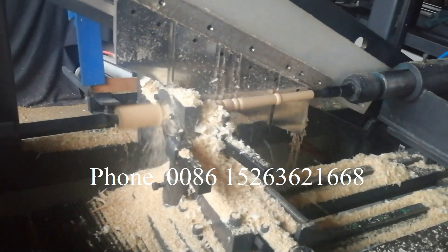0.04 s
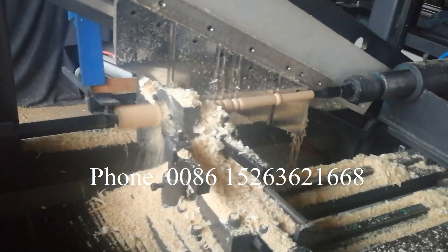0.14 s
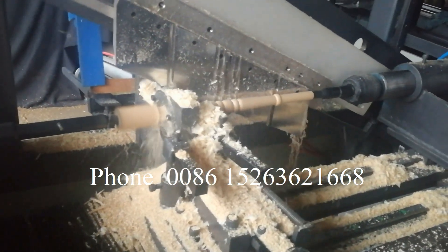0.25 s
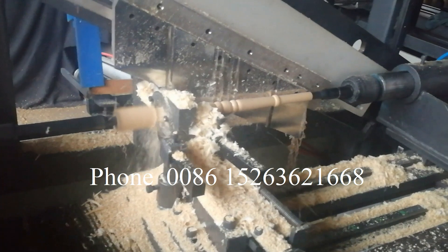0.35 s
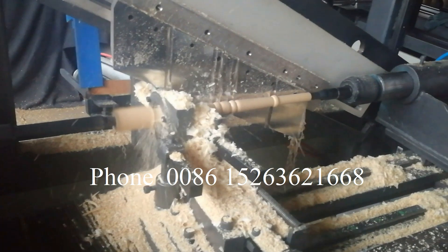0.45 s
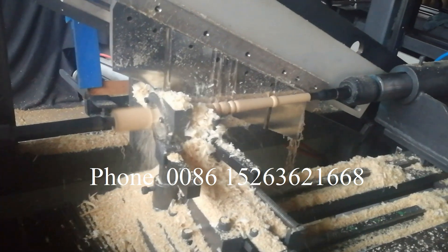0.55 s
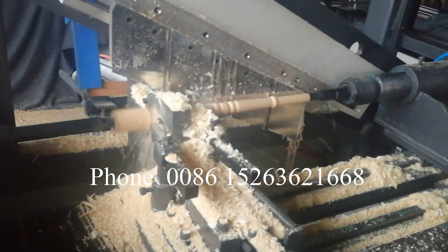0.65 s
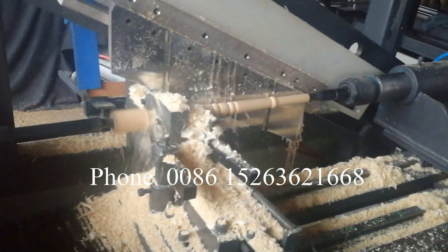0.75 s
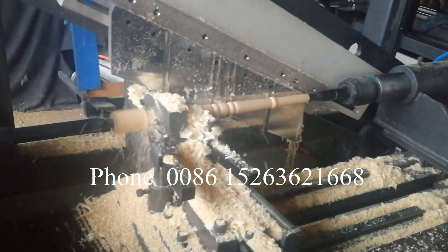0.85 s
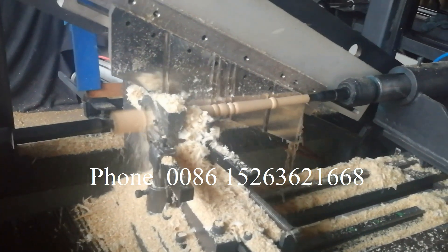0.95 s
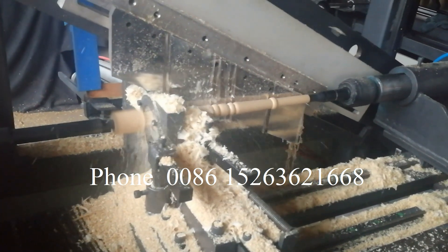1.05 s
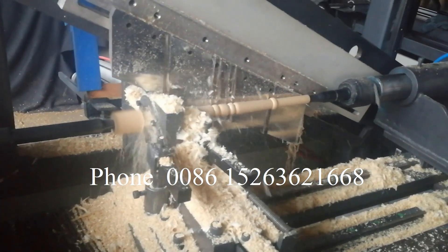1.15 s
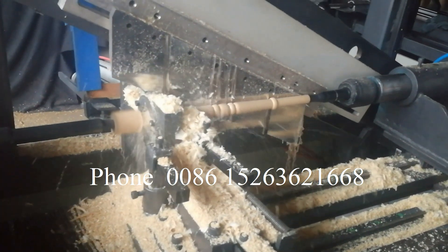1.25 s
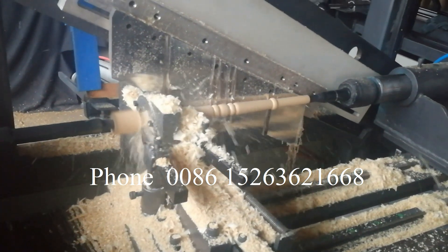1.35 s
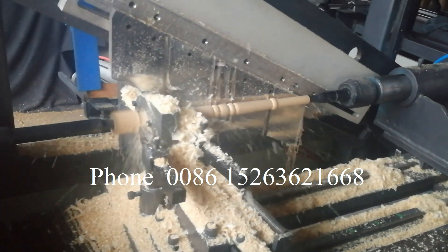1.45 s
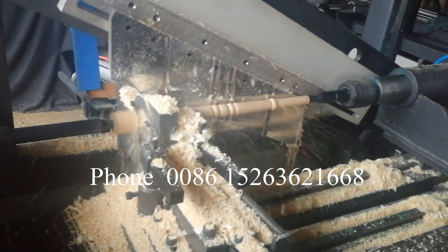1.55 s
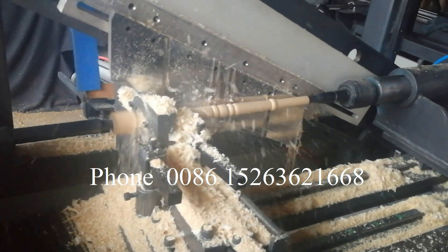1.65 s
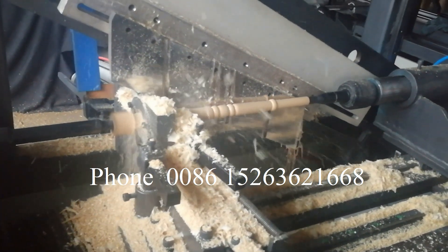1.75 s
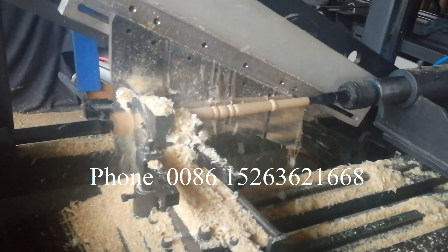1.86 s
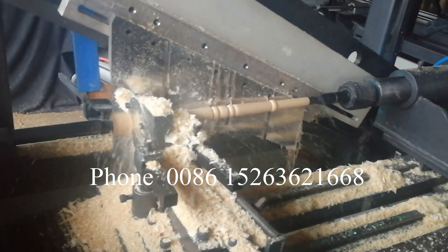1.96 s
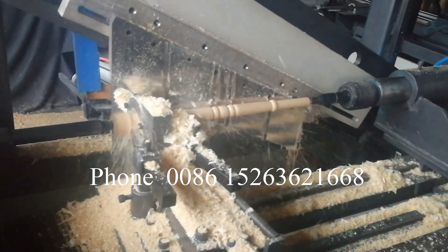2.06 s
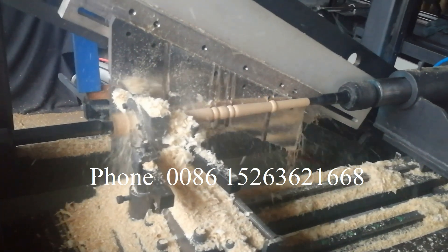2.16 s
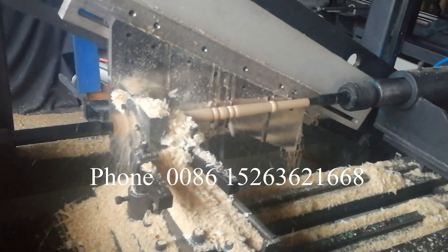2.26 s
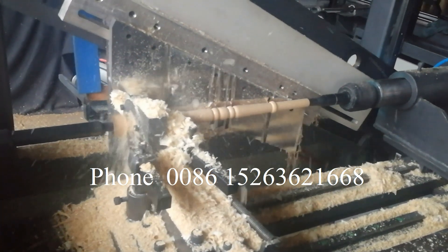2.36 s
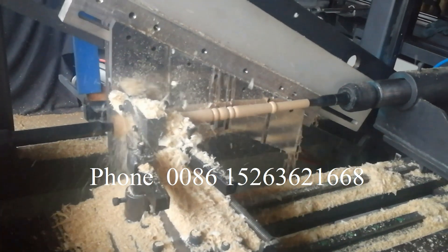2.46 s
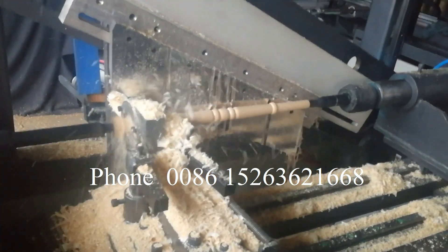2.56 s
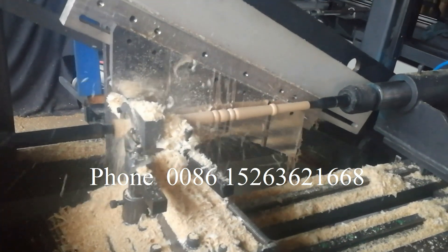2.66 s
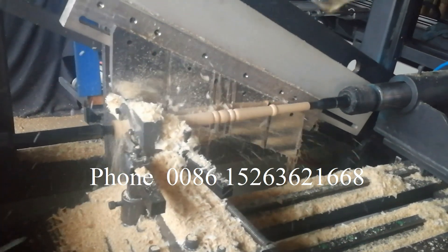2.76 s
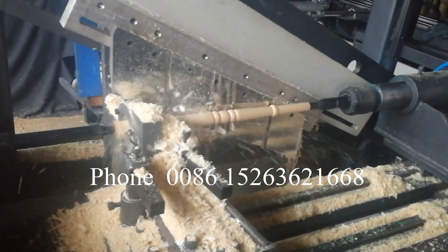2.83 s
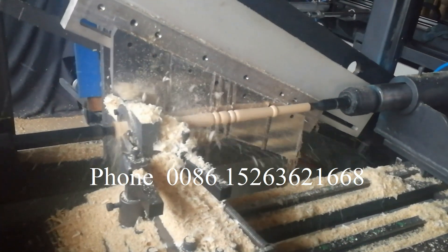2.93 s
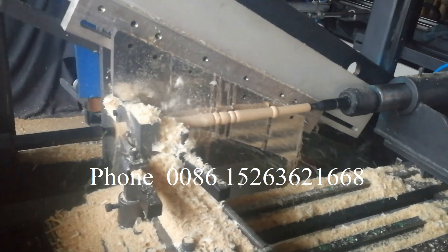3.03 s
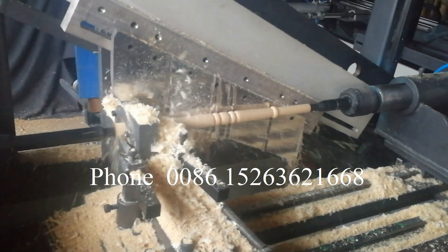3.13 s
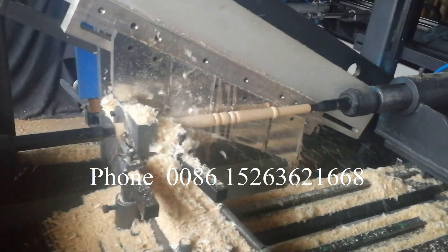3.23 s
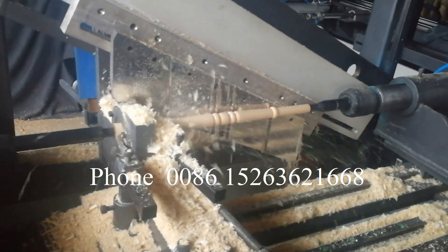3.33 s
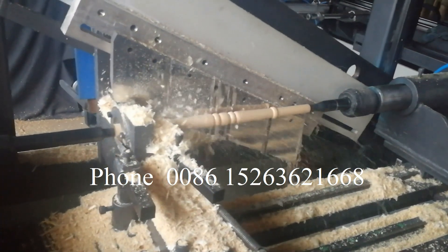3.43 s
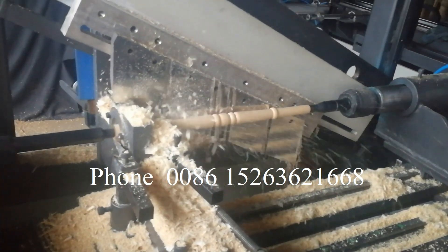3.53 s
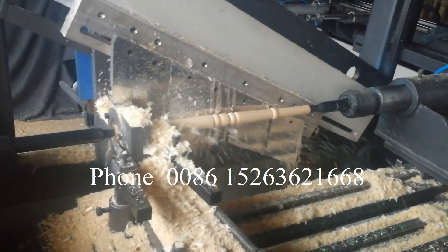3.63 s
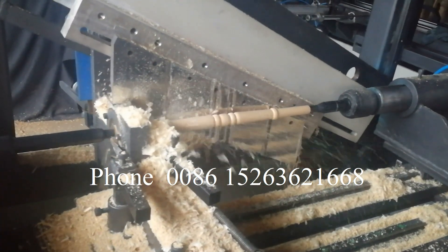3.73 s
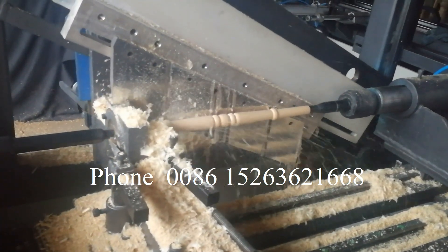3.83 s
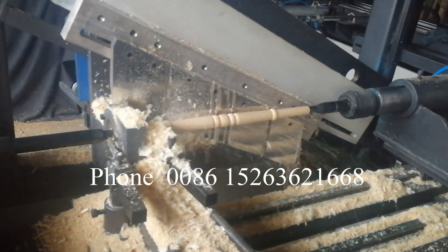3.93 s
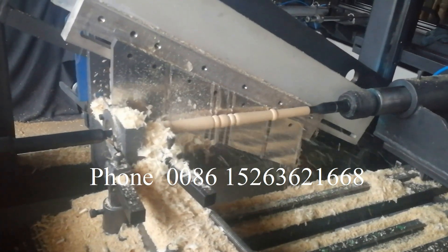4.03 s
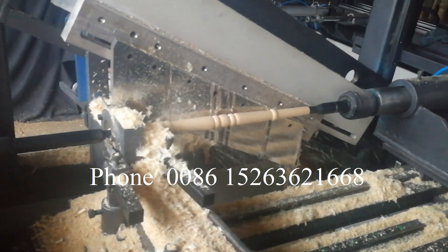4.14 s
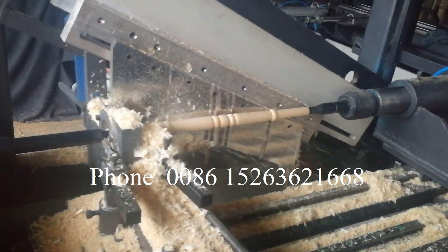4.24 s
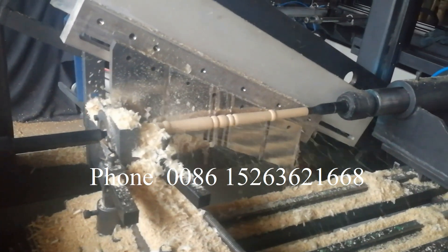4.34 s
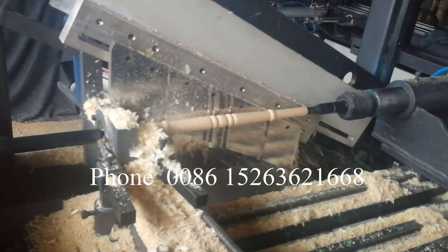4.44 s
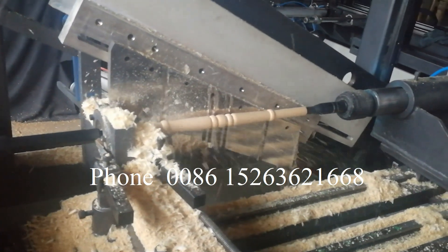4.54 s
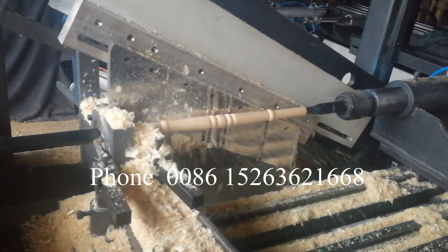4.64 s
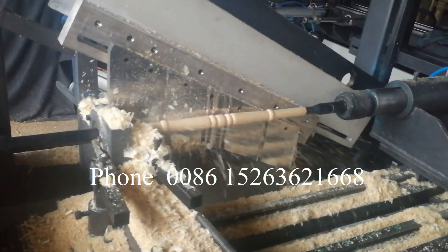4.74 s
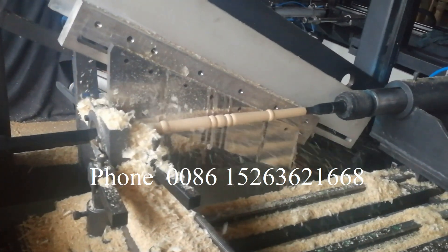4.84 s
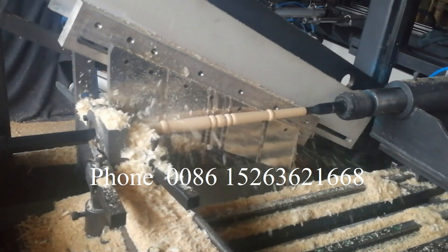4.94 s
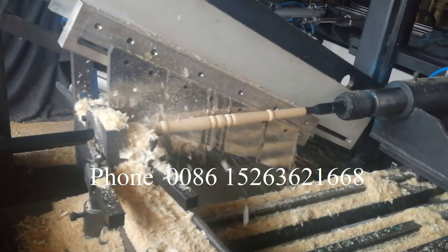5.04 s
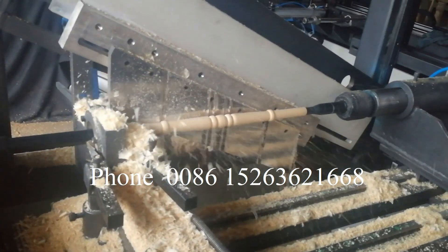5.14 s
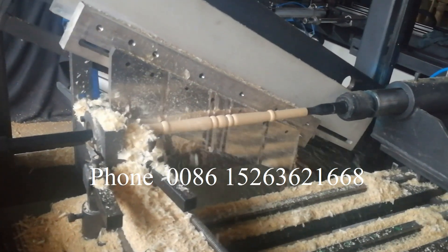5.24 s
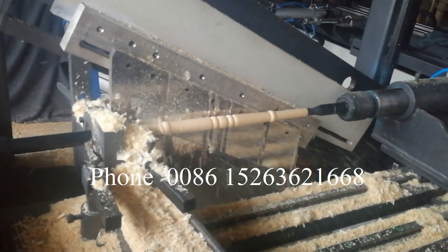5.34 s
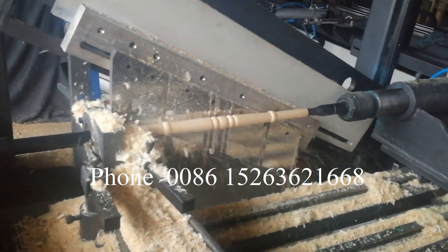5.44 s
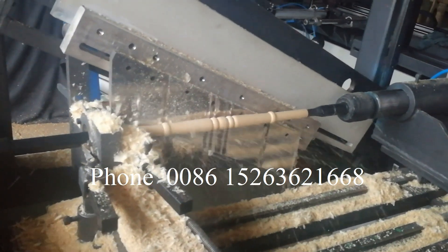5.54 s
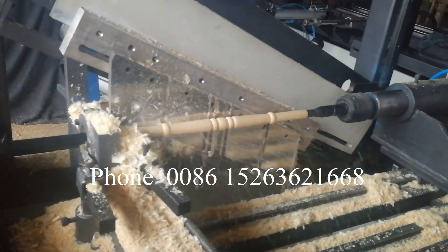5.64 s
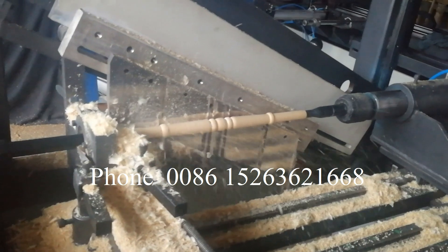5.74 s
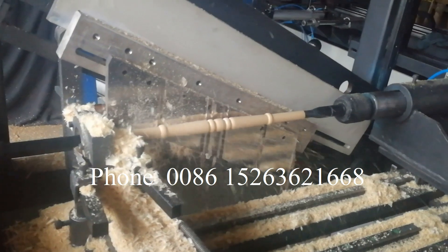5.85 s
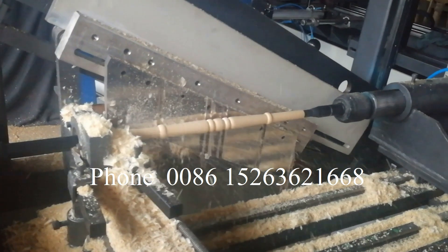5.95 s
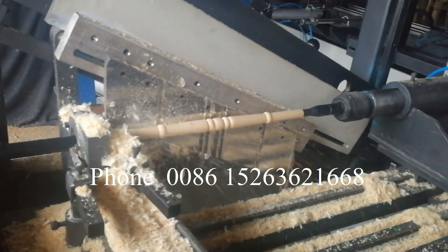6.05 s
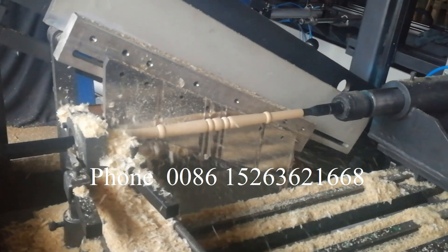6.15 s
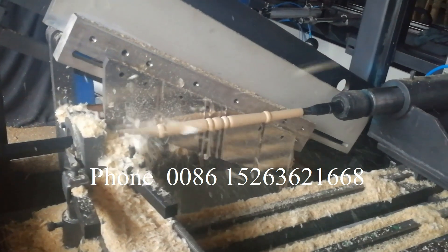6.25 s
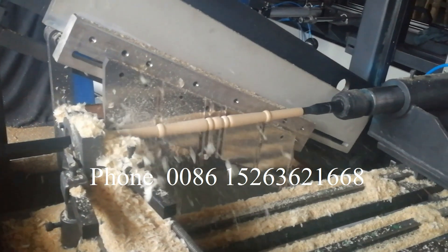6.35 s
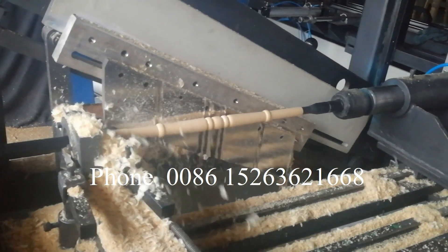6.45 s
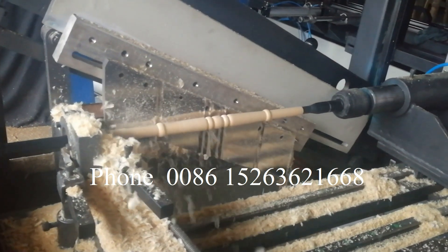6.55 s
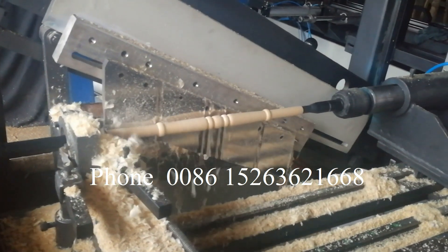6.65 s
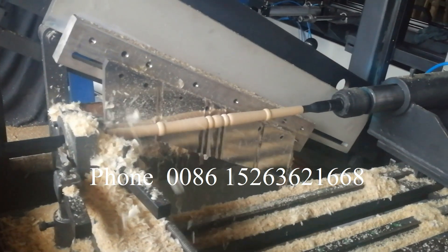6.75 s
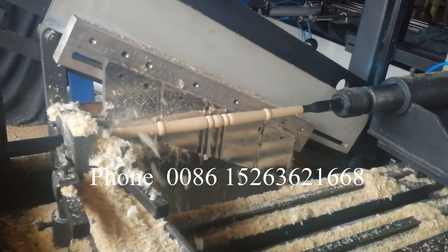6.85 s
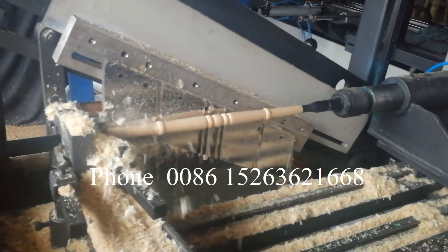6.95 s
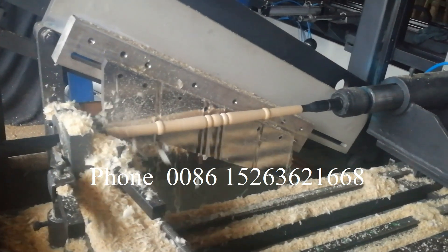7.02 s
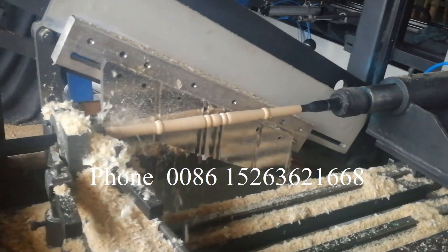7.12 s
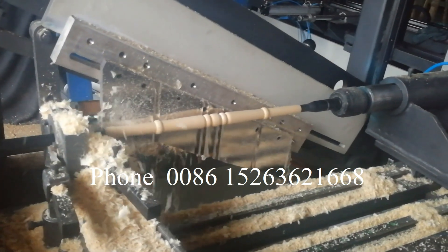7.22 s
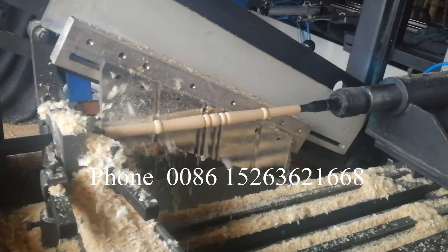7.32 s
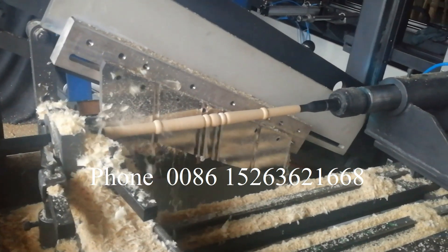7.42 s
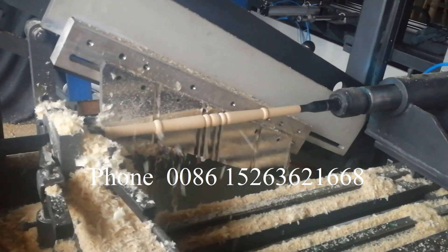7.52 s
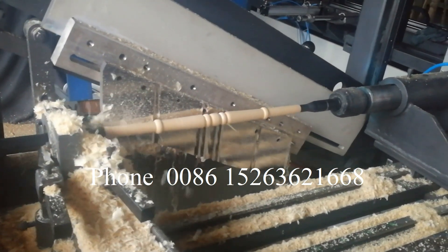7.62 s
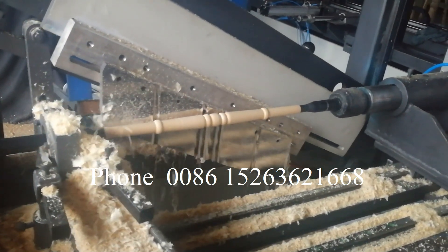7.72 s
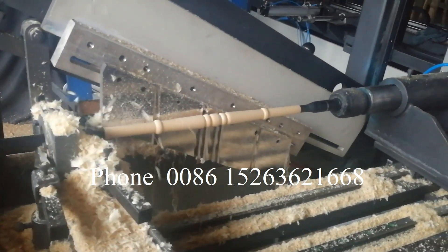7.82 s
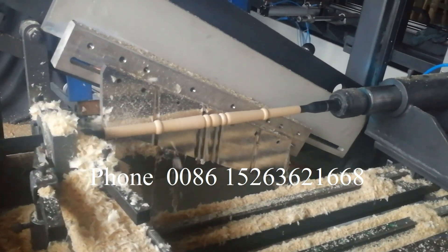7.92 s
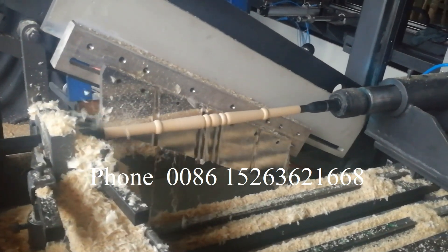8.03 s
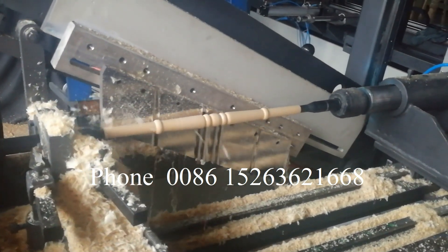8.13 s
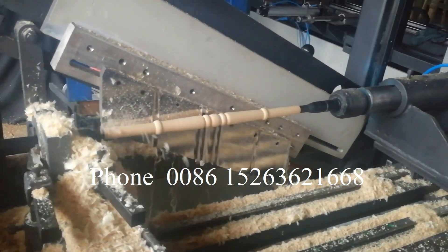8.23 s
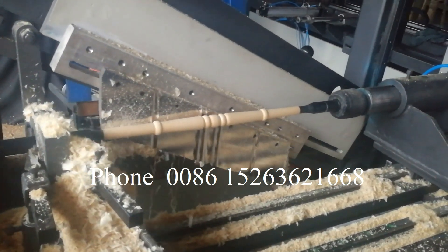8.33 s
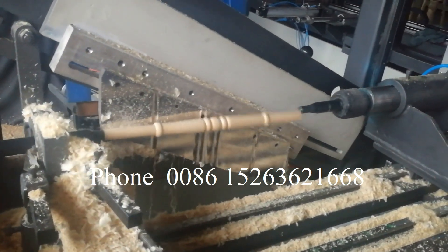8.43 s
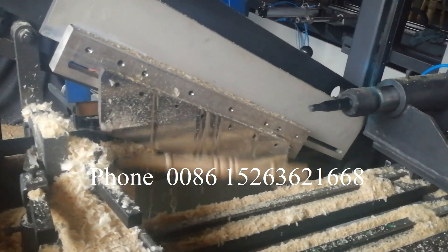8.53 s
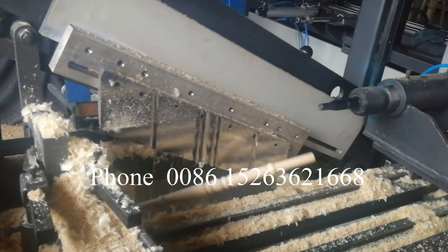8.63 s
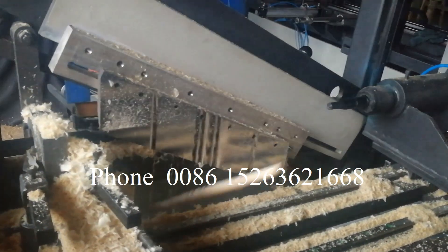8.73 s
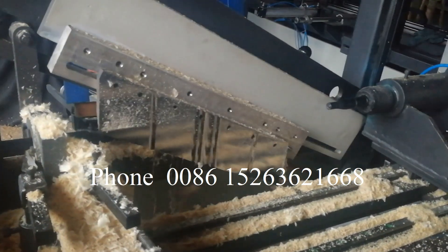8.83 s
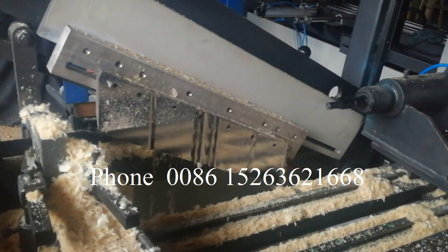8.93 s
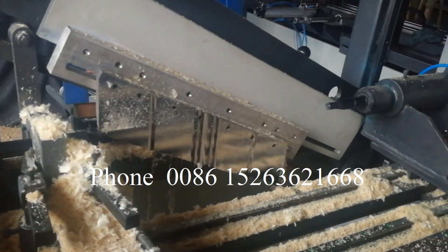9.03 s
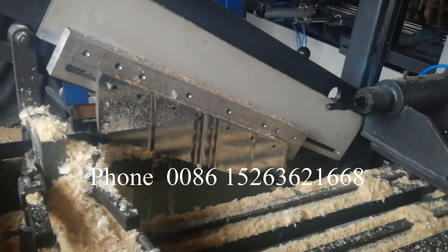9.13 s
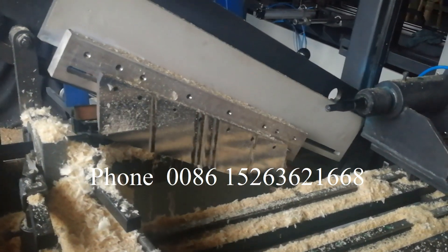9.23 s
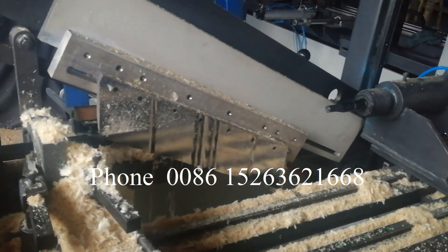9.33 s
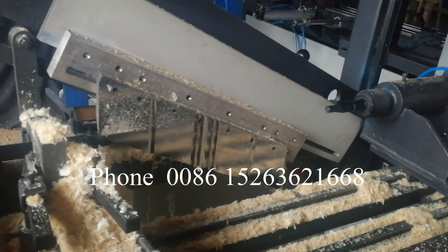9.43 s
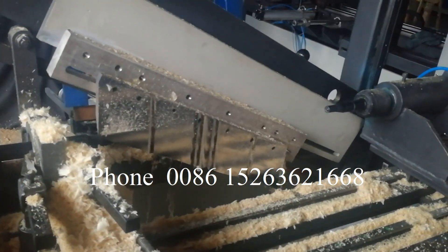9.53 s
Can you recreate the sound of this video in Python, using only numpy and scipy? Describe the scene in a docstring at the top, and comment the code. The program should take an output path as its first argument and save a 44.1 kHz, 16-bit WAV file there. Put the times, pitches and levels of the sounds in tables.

```python
"""Automatic wood lathe, close up.

A workshop, with a stereo microphone near a wooden bar spinning fifty turns a second. A roughing tool
knocks the corners off and hisses; a long blade shears the profile and chatters on the ripples left
one turn before. The centres open with a puff of air and the piece drops. Hums and the blade edge's
squeal are locked to the spindle speed, and a lumpy bass lies behind it all."""
import sys
import numpy as np
from scipy import signal
from scipy.fft import rfft, irfft
from scipy.io import wavfile
from scipy.ndimage import uniform_filter1d

SR = 44100
rng = np.random.default_rng(int(sys.argv[2]) if len(sys.argv) > 2 else 0)


def pcm_store(signal):
    """Save signal as 16-bit PCM."""
    levels = np.round(np.clip(np.atleast_2d(signal), -1, 1) * 32767)
    wavfile.write(sys.argv[1], SR, levels.astype(np.int16).T)


N = 422478
T = np.arange(N) / SR
ROUND_S, ROUGHING_END_S, LEAVE_S, CENTRES_OPEN_S, BLADE_OFF_S = 2.68, 6.27, .25, 8.4, 8.53


# The cut: (time [s], blows over hiss [dB], tool buried [0-1], tip ring [Hz], tip level [dB])
ROUGH_CUT = [(0, 7, 0.05, 9230, -5), (.5, 2, 0.05, 9120, -5), (1.4, 1, 0.1, 8820, -6),
             (2.6, -1.5, 0.57, 8700, -11), (3.2, -4.5, 0.57, 9200, -14), (3.9, 2.5, 0.74, 9300, -11),
             (4.9, 2.5, 1, 10100, -5), (5.3, -6, 1, 11400, -7.5), (6.4, 5, 0.85, 11500, -1)]
# Tearing fibres and a corner blow: (frequency [Hz], relative density [dB])
FIBRES = [(180, -54), (300, -1.5), (404, -21), (835, -23), (1540, -19), (1970, -13), (3300, 0), (4420, -5),
          (8990, 1), (15500, -14)]
CORNER_BLOW = [(2500, -24.5), (6000, -3), (7300, -3.5), (8800, 1), (10500, -5.5), (15500, -0.5)]
# Tool ring in a shallow and a deep cut: (frequency [Hz], width [Hz], relative level [dB])
SHALLOW_RING = [(2000, 96, -7), (2720, 1640, -18.5), (5260, 120, -13), (7140, 360, -8), (7650, 400, -5.5),
                (8200, 540, -6), (9000, 340, -6.5), (11900, 1100, -17.5)]
DEEP_RING = [(2170, 59, 13), (2786, 26, 6), (5680, 190, 10), (8330, 1000, 5), (9880, 1060, 10),
             (12100, 300, 3)]
def roughing(angle):
    """Fibres tear in a hiss; corners strike hard once or twice a turn, each with its own force."""
    blow_db, buried, tip_hz, tip_db = played(ROUGH_CUT)
    force = gain_of(1.3 * rng.standard_normal((int(angle[-1]) + 2, 4)))
    corner, past_corner = (angle * 4).astype(int) % 4, angle * 4 % 1
    share = np.choose(corner, [1, .12, buried, .3])
    strike = 1.9 * (1 - np.exp(-past_corner / .08)) * np.exp(-past_corner / .36)
    blows = share * force[angle.astype(int), corner] * strike
    grit = waver(2.5, samples=40)
    hiss, crack = rng.standard_normal((2, 2, N))
    drive = grit * hiss + gain_of(blow_db) * colour(blows * crack, CORNER_BLOW)
    shallow = colour(drive, FIBRES, SHALLOW_RING, ring_db=16.5)
    deep = colour(drive, FIBRES, DEEP_RING, ring_db=-5.5)
    tip = gain_of(tip_db) * resonate(drive[::-1], tip_hz, width=900)
    cut = np.sqrt(1 - buried) * shallow + np.sqrt(buried) * deep + tip
    cut /= np.sqrt(uniform_filter1d((cut ** 2).mean(0), size=8820))
    uneven_wood = waver(1, samples=6000)
    hitch_db = -2.5 * np.exp(-((T - ROUND_S) / .16) ** 2)  # the feed hitches as the bar comes round
    level = gain_of(-18.5 - .56 * T + hitch_db) * (1 - after(ROUGHING_END_S, LEAVE_S))
    return level * uneven_wood * patchy(cut, depth_db=2)


# The long blade: (time [s], fresh tearing [dB], ripple buzz [dB], edge ring [dB])
BLADE_LEVELS = [(0, -26.5, -43, -33.5), (.5, -30.5, -35.5, -33.5), (1.5, -23.5, -34, -50),
                (2.4, -19, -28.5, -65), (2.74, -23, -33, -43), (3, -20.5, -28, -36),
                (3.6, -21, -31.5, -28.5), (4.9, -22.5, -31, -28.5), (5.6, -22, -28.5, -28.5),
                (6.2, -22.5, -28.5, -31.5), (6.65, -22, -28, -24.5), (7.3, -21.5, -27.5, -28),
                (8.1, -23.5, -27, -26.5), (8.6, -24.5, -27, -29)]
# Shearing wood and buzzing ripples: (frequency [Hz], relative density [dB])
SHEARING = [(150, -45.5), (250, -5), (420, -7), (550, -10.5), (680, -8.5), (1290, -1), (1610, -3),
            (2700, -4), (3630, 3), (4330, -1), (4870, 1.5), (6000, -6), (7200, -4), (7900, -1.5),
            (12000, -12.5), (15500, -28)]
RIPPLE_BUZZ = [(200, -46.5), (300, -10), (450, -10), (555, -21.5), (610, -2), (950, -3), (1150, 0),
               (1450, -2), (1650, -25), (2000, -11.5), (2600, -3), (3100, -5.5), (3750, 1), (4200, -4.5),
               (6000, -6), (9000, -39.5)]
# Blade resonances: (frequency [Hz], width [Hz], relative level [dB])
BLADE_MODES = [(2553, 25, -2.5), (5590, 93, -3), (6504, 214, -2.5), (8050, 1600, -7.5), (11700, 370, -17)]
def blade(angle):
    """Fresh tearing and repeated ripples drive the blade, the bar, the holder and the slide."""
    shear_db, buzz_db, edge_db = played(BLADE_LEVELS)
    surface, fresh = ripples(angle, slip=.08), rng.standard_normal((2, N))
    fresh *= 1 + .057 * np.cos(2 * np.pi * angle) + .14 * np.cos(4 * np.pi * angle)  # bar out of round
    out = gain_of(shear_db) * patchy(colour(fresh, SHEARING, BLADE_MODES, ring_db=7.5), depth_db=2)
    out += (1 - after(CENTRES_OPEN_S, .036)) * gain_of(buzz_db) * colour(surface, RIPPLE_BUZZ)
    repeat = .3 + .4 * after(ROUGHING_END_S + .4, .8)  # share carried over from the turn before
    drive = np.sqrt(repeat) * surface + np.sqrt(1 - repeat) * fresh
    flutter = waver(1.75, samples=5000, shape=(len(CHATTER_BOUTS) + 1, N))
    slack = gain_of(-14 * after(CENTRES_OPEN_S + .02, .04))
    rasp = 1 + np.sqrt(repeat) * np.cos(2 * np.pi * (angle - .62))  # the edge bites once a turn
    strokes = 1 + .55 * (1 - after(ROUGHING_END_S, LEAVE_S)) * np.cos(2 * np.pi * (angle - .12))
    out += gain_of(edge_db) * np.sqrt(flutter[0]) * slack * rasp * edge(drive, fresh)
    out += strokes * chatter(drive, fresh, flutter[1:])
    out += strokes * np.sqrt(flutter[1]) * slack * slide(fresh)
    return (1 - after(BLADE_OFF_S, .04)) * out


def ripples(angle, slip):
    """The surface under the edge: ripples of every length, each slipping a little from turn to turn."""
    around = SR // 50
    count = around // 2 + 1
    steps = rng.standard_normal((int(angle[-1]) + 2, count))
    phase = 2 * np.pi * rng.random(count) + np.cumsum(slip * steps, axis=0)
    height = gain_of(2 * rng.standard_normal(count))
    surface = irfft(height * np.exp(1j * phase), around).ravel()
    return unit_rms(np.interp(angle * around, np.arange(len(surface)), surface)) * np.ones((2, 1))


# Ring of the edge: (time [s], frequency [Hz], sharpness [0-1])
EDGE_RING = [(0, 2650, .1), (.45, 2900, 0), (.62, 3480, .1), (.8, 3500, .7), (1.3, 3520, .75),
             (2, 3450, .2), (3, 3650, 0), (3.6, 3640, .4), (4.3, 3570, .85), (5.8, 3560, .9),
             (6.2, 3620, .8), (6.55, 3760, 1), (7, 3810, 1), (7.3, 3775, 1), (7.78, 3765, 1),
             (7.95, 3700, 1), (8.6, 3660, 1)]
def edge(drive, fresh):
    """The edge's ring shifts as the contact moves along it."""
    hz, sharp = played(EDGE_RING)
    return sharp * resonate(drive, hz, width=205) + (1 - sharp) * resonate(fresh, hz, width=1500)


# Chatter: (part, start [s], length [s], frequency [Hz], level [dB])
CHATTER_BOUTS = [("bar", 2.8, 1.7, 1115, -40.5), ("bar", 3.04, 1.65, 1290, -40),
                 ("bar", 3.16, .2, 1345, -27.5), ("bar", 3.29, .2, 1320, -28),
                 ("bar", 3.48, 0.22, 1300, -29), ("bar", 3.69, 0.2, 1280, -29.5),
                 ("bar", 3.84, 0.5, 1280, -33), ("bar", 4.52, 0.17, 1280, -32),
                 ("rest", 4.27, 2.07, 1140, -39), ("heel", 0.4, 1, 3510, -34), ("heel", 1.3, .7, 3480, -31),
                 ("heel", 4.05, .3, 3580, -26), ("heel", 4.33, .62, 3560, -26),
                 ("heel", 5.38, .45, 3570, -23), ("heel", 5.75, .3, 3600, -27),
                 ("heel", 6.12, .35, 3570, -29), ("heel", 8.445, 0.035, 3640, -20),
                 ("heel", 6.36, 1.4, 3530, -31), ("holder", 1.36, 1.4, 5700, -32.5),
                 ("holder", 1.5, 1, 3270, -34), ("tool", 3.44, 1.67, 9750, -36),
                 ("tool", 3.5, 2.9, 6450, -39.5), ("rest", 1.45, 1.35, 810, -41),
                 ("rest", 4.36, 2, 845, -45), ("rest", 6.2, 2.3, 945, -42),
                 ("holder", 1.45, 0.5, 4720, -35), ("holder", 1.85, .85, 4720, -28),
                 ("holder", 3.5, 3.02, 4790, -33), ("holder", 4.3, .4, 4830, -31),
                 ("holder", 5.35, .45, 4720, -29), ("holder", 6.2, 2.6, 4850, -39),
                 ("slide", 0, 1.2, 7500, -33), ("tool", 1.35, 1.34, 8470, -27.5)]
# Each part's resonance: (width [Hz], follows the ripples [0 or 1])
PART_RESPONSE = {"bar": (90, 1), "rest": (70, 1), "heel": (190, 0), "holder": (260, 0), "slide": (300, 0),
                 "tool": (700, 0)}
def chatter(drive, fresh, flutter):
    """The bar and parts of the lathe ring in bouts; short bouts waver less."""
    out = np.zeros((2, N))
    for wobble, (part, start, length, hz, db) in zip(flutter, CHATTER_BOUTS):
        width, follows = PART_RESPONSE[part]
        bout = slice(round(start * SR), round((start + length) * SR))
        level = swell(start, length, db) * wobble ** min(length / .6, 1)
        out[:, bout] += level[bout] * resonate((drive if follows else fresh)[:, bout], hz, width)
    return out


# The slide's two rings: (time [s], lower [Hz], level [dB], upper [Hz], level [dB])
SLIDE_RINGS = [(3.5, 8000, -34, 8440, -46), (4.4, 8040, -27.5, 8500, -39), (5.2, 7810, -25.5, 8340, -28),
               (5.5, 7720, -28, 8600, -36), (6.15, 7870, -26, 8650, -32), (6.4, 7860, -35, 8700, -40),
               (7.2, 7860, -32, 8700, -36), (7.55, 7980, -30.5, 8700, -33), (8.5, 7860, -41, 8750, -49)]
def slide(fresh):
    """The slide sings as the blade comes down."""
    low_hz, low_db, high_hz, high_db = played(SLIDE_RINGS)
    lower = gain_of(low_db) * resonate(fresh, low_hz, width=320)
    upper = gain_of(high_db) * resonate(fresh, high_hz, width=390)
    return after(SLIDE_RINGS[0][0], .3) * (lower + upper)


# The tool digs in: (time [s], relative level [dB], ring [Hz])
TOOL_DIGS = [(1.1553, -13, 3470), (1.9749, -15, 3290), (2.2947, -12, 4760), (2.3745, -9, 4650),
             (2.4538, -15, 4800), (5.6545, -12, 4800)]
def digs():
    """Each dig is a short burst of three close rings, slightly left of centre."""
    out, t = np.zeros(N), T[:SR // 20]
    for s, db, hz in TOOL_DIGS:
        ring = sum(np.sin(2 * np.pi * (hz * (1 + .1 * (detune - .5)) * t + phase))
                   for detune, phase in rng.random((3, 2)))
        ring *= (1 - np.exp(-t / .001)) * gain_of(-60 * t / .025)
        out[round(s * SR):][:len(t)] += gain_of(db) * ring / abs(ring).max()
    return gain_of([[-1.5], [-3]]) * out


# Blows at the microphone: (time [s], level [dB], left over right [dB])
RELEASE_KNOCKS = [(8.415, -19, 0), (8.447, -20, 0), (8.49, -22, 0)]
PIECE_DROPS = [(8.822, -9.5, 2.5), (8.843, -16, 2.5)]
STOP_KNOCKS = [(8.6922, -18, -2.6), (9.0955, -10.5, 0), (9.115, -20, 0)]
WOOD_SNAPS = [(2.6885, -2, 4), (8.403, -9, 1.5)]
# What they set ringing: (frequency [Hz], relative level [dB], time to fall 60 dB [s])
BED_MODES = [(185, -2, .3), (675, -3, .17), (1260, -7, .12)]
BAR_MODES = [(210, -4, .1), (390, -5, .07), (560, -6, .05), (780, -1, .055), (937, 0, .06),
             (1310, -2, .045), (1480, -3, .045), (1701, -3, .045), (2266, -11, .03)]
STEEL_MODES = [(1206, -9, .07), (1590, -4, .1), (2600, -5, .08), (3050, -10, .05), (4145, 0, .045),
               (5749, -11, .05), (7300, -17, .025), (8880, -13, .045)]
SPLINTER_MODES = [(6500, -12, .008), (8100, 0, .011), (8900, -5, .009), (11000, -14, .008)]
def impacts():
    """The release jolts the bed, the piece drops, steel stops clack and splinters snap."""
    return (knocks(RELEASE_KNOCKS, BED_MODES, crack_db=-14, tail_db=1, tail_s=.25)
            + knocks(PIECE_DROPS, BAR_MODES, crack_db=-12, tail_db=1, tail_s=.2)
            + knocks(STOP_KNOCKS, STEEL_MODES, crack_db=-12, tail_db=-4, tail_s=.15)
            + knocks(WOOD_SNAPS, SPLINTER_MODES, crack_db=-16, tail_db=-8, tail_s=.03))


def knocks(events, modes, crack_db, tail_db, tail_s):
    """Each blow cracks and rings; the workshop walls smear both into a tail."""
    out, t = np.zeros((2, N)), T[:SR // 2]
    for s, db, pan_db in events:
        ring = sum(gain_of(mode_db - 60 * t / t60) * np.sin(2 * np.pi * (hz * t + rng.random()))
                   for hz, mode_db, t60 in modes)
        ring *= np.minimum(t / .0002, 1) / abs(ring).max()
        crack = gain_of(crack_db - 60 * t / .075) * uniform_filter1d(rng.standard_normal(len(t)), size=3)
        direct = ring + crack
        walls = rng.standard_normal((2, len(t))) * gain_of(-60 * t / tail_s)
        tail = signal.fftconvolve(direct[None], walls / np.linalg.norm(walls[0]), axes=1)[:, :len(t)]
        blow = gain_of([[db + pan_db / 2], [db - pan_db / 2]]) * (direct + gain_of(tail_db) * tail)
        start = round(s * SR)
        out[:, start:start + len(t)] += blow[:, :N - start]
    return out


# The air jet: (frequency [Hz], relative density [dB])
AIR_JET = [(590, -7.5), (1000, -8.5), (2010, -13), (2690, -10), (3500, -15), (4070, -15), (6580, -12),
           (13500, -24)]
# Pipes it sets ringing: (frequency [Hz], width [Hz], relative level [dB])
PIPE_MODES = [(1300, 150, -8), (2630, 150, -7), (4140, 200, -6)]
def air():
    """The tailstock cylinder vents with a hiss and a thin falling whistle; the piece scrapes off."""
    since = np.maximum(T - CENTRES_OPEN_S, 0)
    since_shut = np.maximum(since - .398, 0)
    jet = rng.standard_normal((2, N))
    blast_db = 5.5 * np.exp(-since / .07)
    shut_db = -10 * np.minimum(since_shut / .053, 1) - 26.5 * since_shut
    hiss = gain_of(-27.5 + blast_db + shut_db) * colour(jet, AIR_JET, PIPE_MODES, ring_db=.5)
    whistle = gain_of(-47 - 400 * since_shut) * resonate(jet, 14850 - 1100 * since, width=187)
    scrape = swell(start=8.64, length=.09, db=-29) * resonate(jet[::-1], 2670, width=120)
    return after(CENTRES_OPEN_S, .027) * (hiss + scrape + whistle)


def spindle():
    """Angle in turns, whole where the proudest corner meets the tool; the cut slows it slightly."""
    corner_sag = .13 * (1 - after(ROUND_S, .15))
    roughing_sag = .09 * (1 - after(ROUGHING_END_S + .14, .4))
    turns_per_s, first_corner_s = 50.26 - corner_sag - roughing_sag, .0155
    return np.cumsum(turns_per_s) / SR - first_corner_s * turns_per_s[0] + 1


# Hums and, in orders 72-78, the edge's squeal: (order name, start [s], length [s], level [dB])
TONE_SWELLS = [("2nd", 1.8, 0.96, -48), ("2nd", 2.7, 1.3, -47), ("2nd", 6.2, 1.33, -50.5),
               ("2nd", 7.9, 0.69, -50), ("4th", 0, 2.87, -46), ("4th", 2.72, 2.82, -47),
               ("4th", 5.6, 1.09, -41), ("4th", 6.7, 1.9, -50.5), ("5th", 0, 2.99, -38.5),
               ("5th", 1.46, 1.23, -44), ("5th", 2.66, 1.97, -44.5), ("5th", 5.32, 0.58, -40.5),
               ("5th", 5.9, 0.84, -43), ("9th", 7.6, 1.23, -47), ("13th", 6.1, 2.5, -45),
               ("17th", 7.6, 1, -44.5), ("19th", 6.63, 2.2, -47), ("22nd", 6.2, 1.4, -44),
               ("78th", 6.4, 1.7, -36), ("76th", 6.5, .9, -31), ("75th", 6.4, 1.6, -28.5),
               ("74th", 6.55, .85, -31), ("74th", 7.6, 1.1, -28), ("73rd", 7.75, 1, -30),
               ("72nd", 7.85, .9, -33), ("26th", 4.88, 0.66, -34.5), ("26th", 5.75, 1, -33.5),
               ("26th", 6.75, 2.1, -28.5), ("37th", 0, 2.9, -46.5), ("37th", 2.38, 1.5, -43),
               ("37th", 2.85, 0.26, -36), ("37th", 6.3, 1.06, -42.5), ("37th", 7.5, 0.98, -40)]
# Each named order: (rate [cycles per turn])
TONE_ORDERS = {"2nd": 2, "4th": 4, "5th": 5, "9th": 9, "13th": 13, "17th": 17, "19th": 19, "22nd": 22,
               "26th": 26, "37th": 37, "72nd": 72, "73rd": 73, "74th": 74, "75th": 75, "76th": 76, "78th":
               78}
def hums_and_squeal(angle):
    """Tones locked to the spindle speed: low hums and the blade edge's squeal near 3.7 kHz."""
    phase = {name: rng.random() for name in TONE_ORDERS}
    wobbles = waver(1.6, samples=3000, shape=(len(TONE_SWELLS), N))
    tones = sum(wobble * swell(*bout) * np.cos(2 * np.pi * (TONE_ORDERS[name] * angle + phase[name]))
                for wobble, (name, *bout) in zip(wobbles, TONE_SWELLS))
    slack = gain_of(-14 * after(CENTRES_OPEN_S + .047, .03))
    return slack * np.sqrt(2) * tones * gain_of([[.4], [-.4]])


# The workshop's bass, thuds and roar: (frequency [Hz], relative density [dB])
SHOP_BASS = [(47, -32), (80, -12.5), (130, -4.5), (201, -1.5), (368, -14), (418, -9.5), (462, -18.5),
             (600, -16.5), (780, -50), (1320, -120)]
SHOP_THUDS = [(10, -1), (35, -7), (60, 5), (100, -0.5), (300, -84)]
SHOP_ROAR = [(180, -22), (300, -8), (336, -23), (735, -8), (1060, -1.5), (1560, -5), (2680, -10.5),
             (9000, -80), (11700, -108)]
# Deep thumps: (start [s], length [s], level [dB])
DEEP_THUMPS = [(.05, 0.27, -49), (2.851, 0.41, -47), (4.375, 0.31, -49), (5.4, 1.24, -51),
               (6.65, 1.04, -47), (8, 0.72, -55), (9.195, 0.74, -40.5)]
def workshop():
    """Lumpy bass throughout; after the cut, a dull roar and a whirr that runs down."""
    running_down = np.maximum(T - CENTRES_OPEN_S - .83, 0)
    bass = gain_of(-45 - 7 * np.exp(-((T - 4.2) / .59) ** 2))  # thins mid-cut
    bass += after(CENTRES_OPEN_S, .17) * gain_of(-35.5 - 59 * running_down)
    thumps = gain_of(-68) + sum(swell(*row) for row in DEEP_THUMPS)
    roar = after(CENTRES_OPEN_S, .05) * gain_of(-33 - 20.5 * running_down)
    lumps = waver(1.8, samples=5000)
    bass_noise, roar_noise, thud_noise = rng.standard_normal((3, 2, N))
    low = bass * colour(bass_noise, SHOP_BASS) + thumps * colour(thud_noise, SHOP_THUDS)
    whirr = resonate(roar_noise[::-1], 2850 - 2400 * running_down, width=1000)
    whirr += gain_of(-5 - 90 * np.maximum(T - 9.13, 0)) * resonate(bass_noise, 4250, width=1100)
    return lumps * low + roar * (colour(roar_noise, SHOP_ROAR) + gain_of(-5) * whirr)


def gain_of(db):
    return 10 ** (np.asarray(db) / 20)


def unit_rms(x):
    return x / np.sqrt(np.mean(x ** 2) + 1e-20)


def at_hz(points, hz):
    """A curve's value on a log frequency axis."""
    known_hz, value = np.transpose(points)
    return np.interp(np.log(hz + 1), np.log(known_hz + 1), value)


def played(rows):
    """Columns of a time curve at every sample."""
    s, *columns = np.transpose(rows)
    return [np.interp(T, s, column) for column in columns]


def after(s, ramp_s):
    """A straight ramp from 0 to 1, centred on the moment s."""
    return np.clip((T - s) / ramp_s + .5, 0, 1)


def swell(start, length, db):
    """A gain that rises, holds and falls; one starting at 0 s is already up."""
    ramp_s = min(.3, length / 2)
    rise = np.minimum(T - start, start + length - T) / ramp_s + (start <= 0) * (T < ramp_s)
    return gain_of(db) * np.sin(np.pi / 2 * np.clip(rise, 0, 1)) ** 2


def waver(depth_db, samples, shape=N):
    """A random gain, smoothed over so many samples."""
    return gain_of(depth_db * unit_rms(uniform_filter1d(rng.standard_normal(shape), size=samples)))


def patchy(x, depth_db):
    """Patches of the spectrum, some 800 Hz by 50 ms, surge and sink at random."""
    spectra = signal.stft(x, nperseg=512)[2]
    patches = uniform_filter1d(rng.standard_normal(spectra.shape[1:]), size=9, axis=0)
    patches = uniform_filter1d(patches, size=9, axis=1)
    return signal.istft(spectra * gain_of(depth_db * unit_rms(patches)), nperseg=512)[1][:, :N]


def colour(x, spectrum, modes=(), ring_db=0):
    """Causal filter from a broad spectrum plus resonant humps; output of rms 1."""
    hz = abs(np.fft.fftfreq(4096, 1 / SR))
    power = gain_of(2 * at_hz(spectrum, hz))
    for centre, width, db in modes:
        power += gain_of(2 * (db + ring_db)) / (1 + (2 * (hz - centre) / width) ** 2) ** 2
    log_gain = np.log(power + 1e-10) / 2
    taps = np.fft.ifft(np.exp(log_gain - 1j * signal.hilbert(log_gain).imag)).real[:2048]
    return unit_rms(signal.oaconvolve(x, taps[None])[:, :N])


def resonate(x, hz, width):
    """A resonance that can glide: shift hz to zero, smooth twice, shift back; output of rms 1."""
    carrier = np.exp(2j * np.pi * np.cumsum(hz * np.ones(x.shape[-1])) / SR)
    pole = np.exp(-np.pi * width / SR)
    return unit_rms((carrier * signal.lfilter([1], [1, -2 * pole, pole * pole], x / carrier)).real)


# Between the microphone's channels: (frequency [Hz], likeness [0-1])
MIC_LIKENESS = [(30, 0.81), (180, 0.74), (350, 0.21), (600, 0.36), (1200, 0.2), (2500, 0.1), (5000, 0.46),
                (9000, 0.096), (15000, .1)]
# Their phase: (frequency [Hz], left leads by [rad])
MIC_LEAD = [(150, 0), (300, .5), (600, 2.2), (1200, .6), (2500, .6), (5000, 1), (15000, 1.5)]
def microphone(x, lean):
    """Two signals become a partly alike left and right, leaning by frequency."""
    hz = np.fft.rfftfreq(N, 1 / SR)
    left, other = rfft(x)
    alike, tilt = at_hz(MIC_LIKENESS, hz), gain_of(at_hz(lean, hz) / 2)
    right = (alike * left + np.sqrt(1 - alike ** 2) * other) * np.exp(-1j * at_hz(MIC_LEAD, hz))
    return irfft([left * tilt, right / tilt], N)


# Each side of the lathe from the microphone: (frequency [Hz], left over right [dB])
ROUGHING_SIDE = [(60, -19), (120, -3), (240, -6), (480, 20), (950, 7), (1890, 9), (3770, -3), (9500, 7),
                 (15000, -11)]
BLADE_SIDE = [(60, -1), (120, 0.5), (240, -2), (480, 5.5), (950, 3.5), (1890, 3), (3770, -0.5), (9000, 8),
              (15000, -9)]
def scene():
    """One cycle of the lathe, heard from beside it."""
    angle = spindle()
    out = microphone(roughing(angle), ROUGHING_SIDE)
    out += microphone(blade(angle) + workshop() + air(), BLADE_SIDE)
    return out + impacts() + hums_and_squeal(angle) + digs()


def record(dry):
    """The recorder clips at full scale, then cuts the highest treble."""
    lowpass = signal.firwin(511, 15750, window=("kaiser", 9), fs=SR)
    return signal.oaconvolve(np.clip(dry, -1, 1), lowpass[None], "same")


dry = scene()
out = record(dry)
pcm_store(out)
```